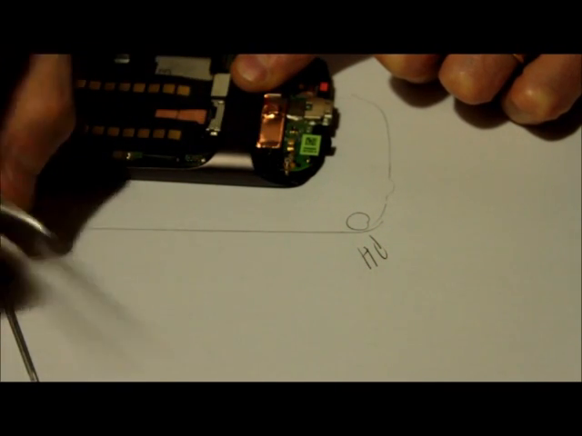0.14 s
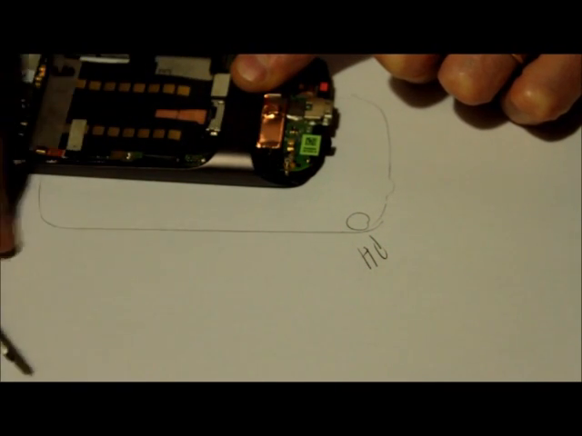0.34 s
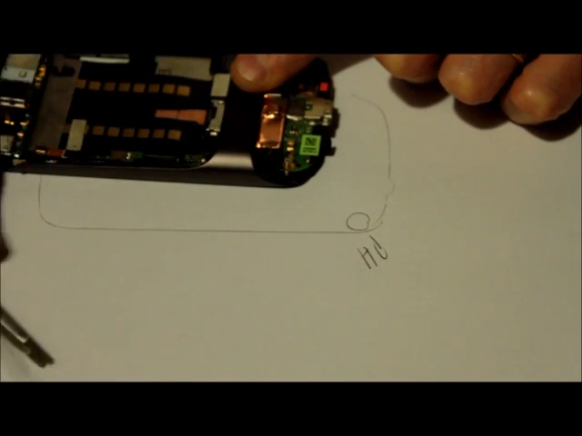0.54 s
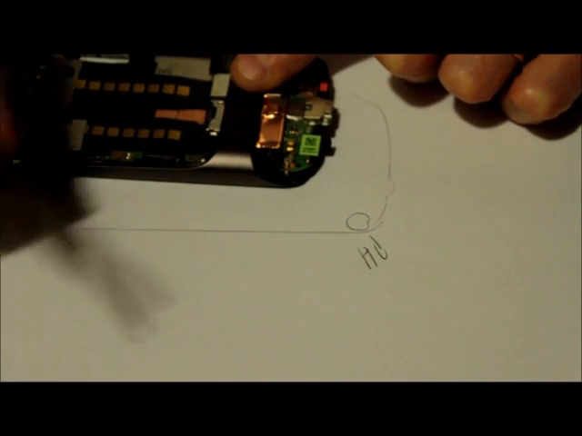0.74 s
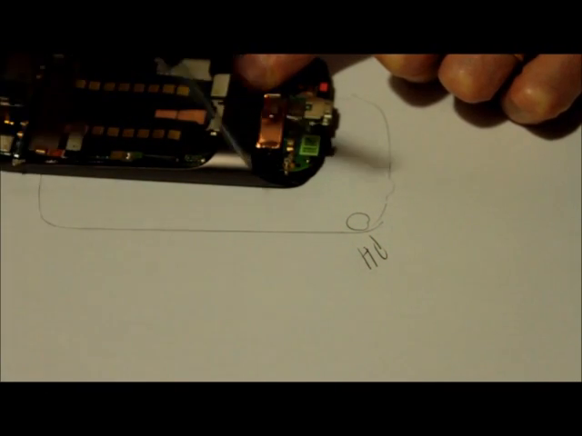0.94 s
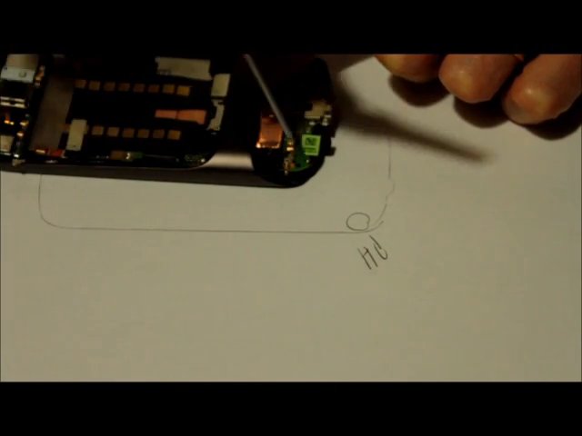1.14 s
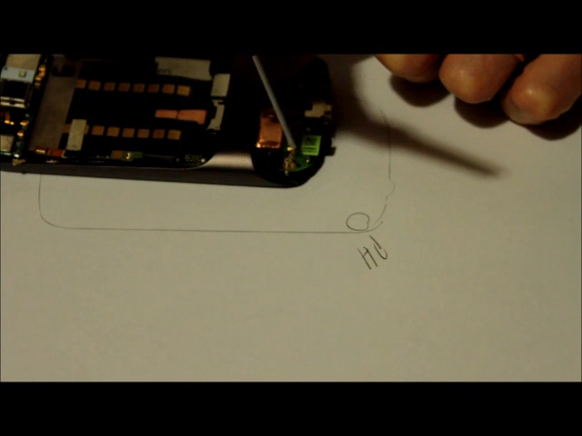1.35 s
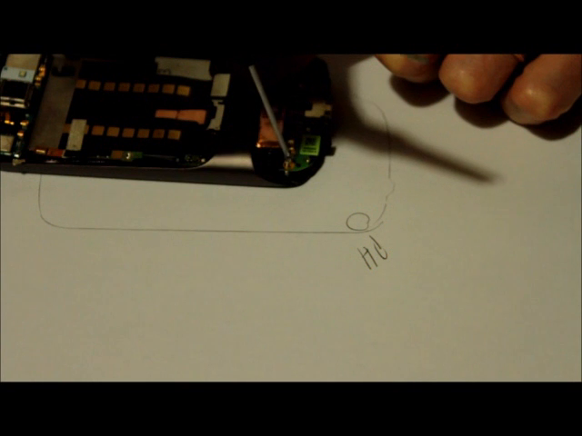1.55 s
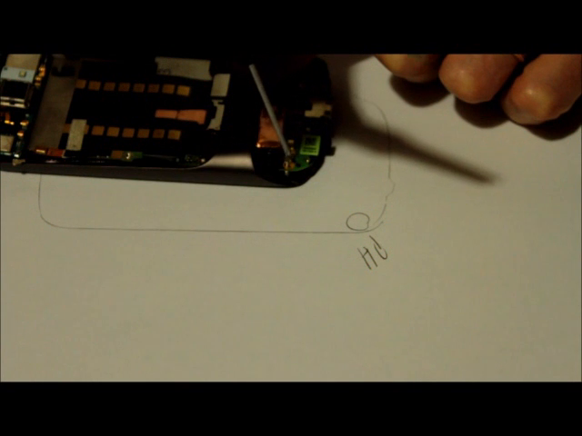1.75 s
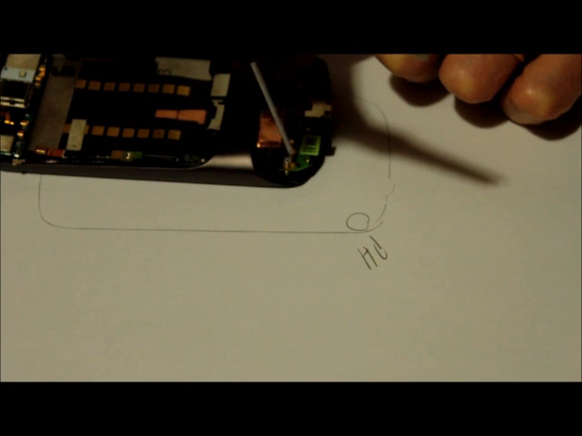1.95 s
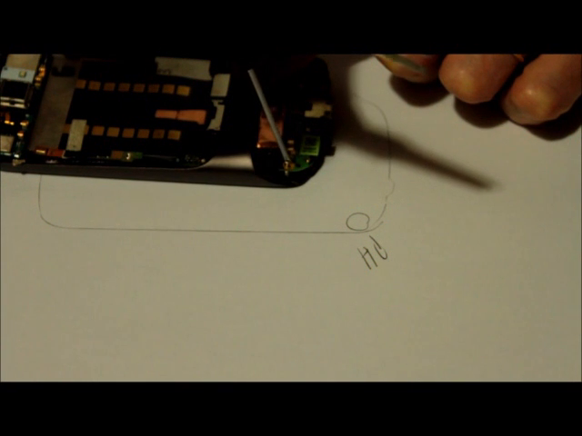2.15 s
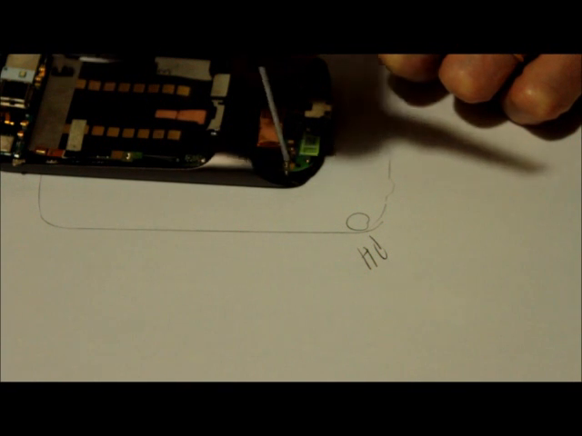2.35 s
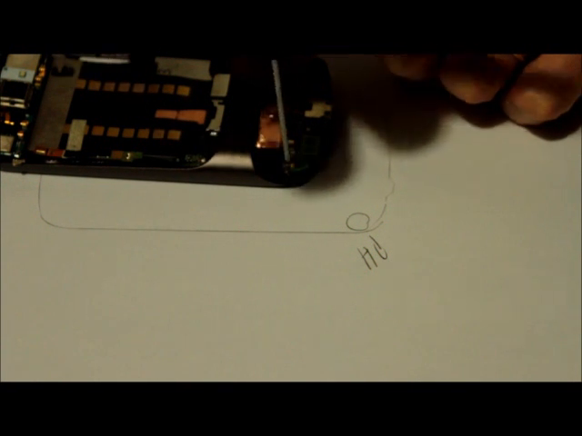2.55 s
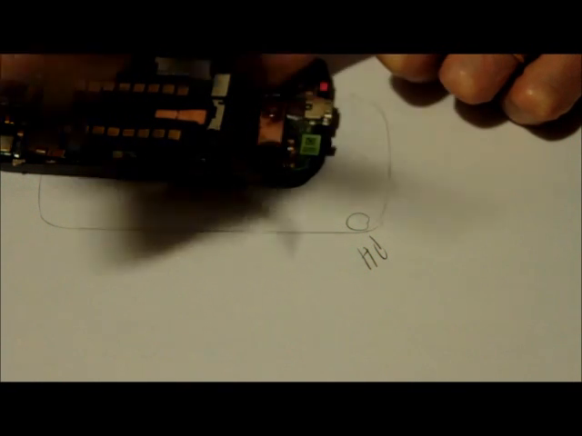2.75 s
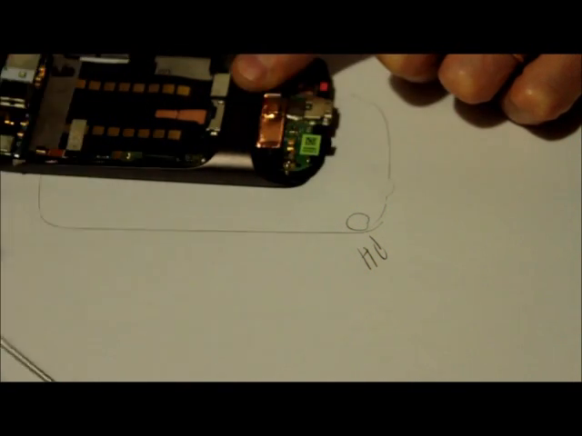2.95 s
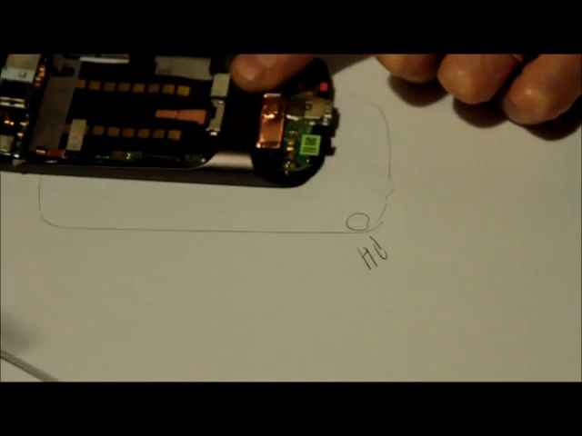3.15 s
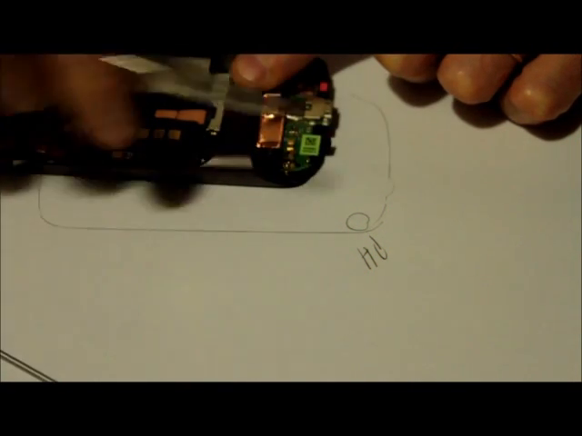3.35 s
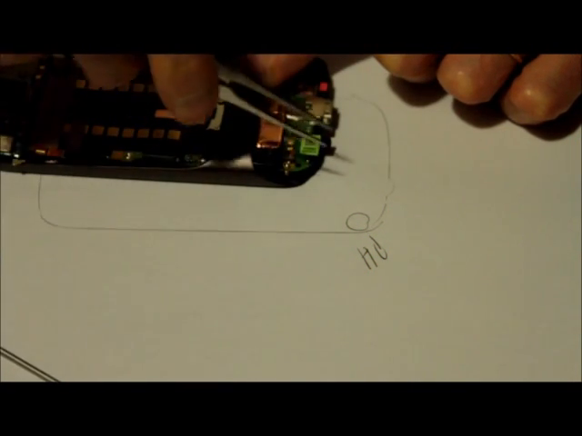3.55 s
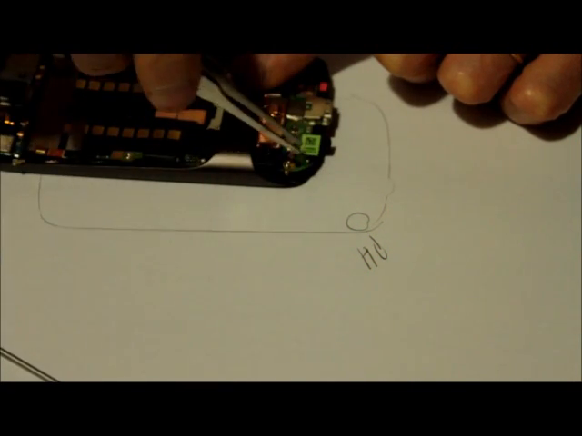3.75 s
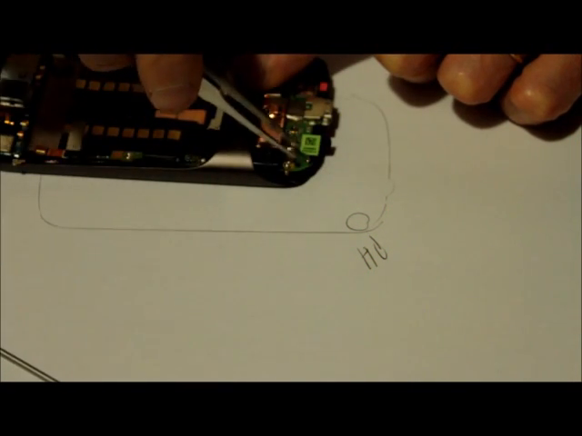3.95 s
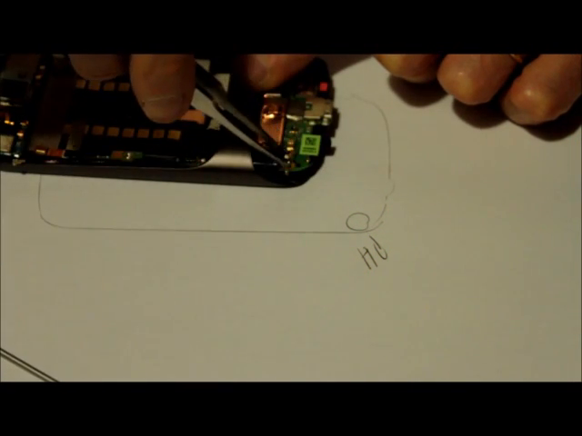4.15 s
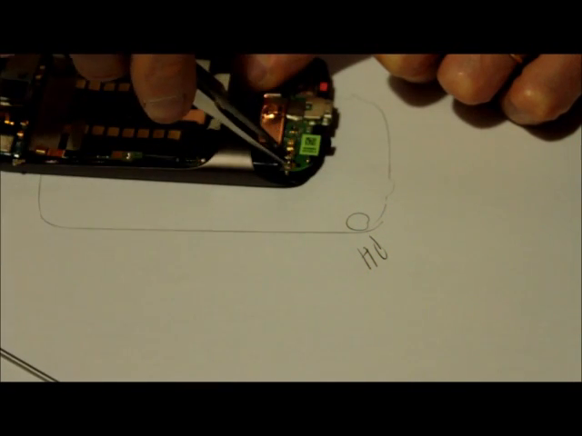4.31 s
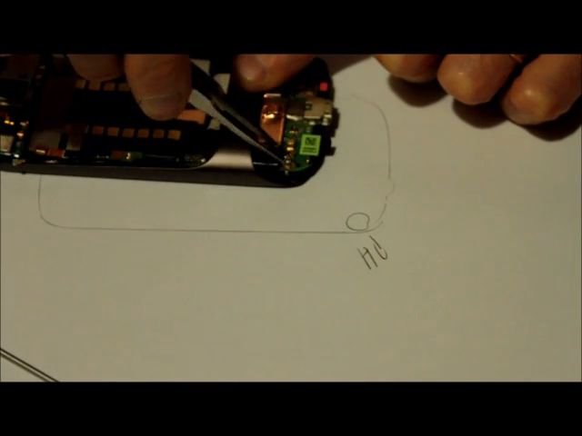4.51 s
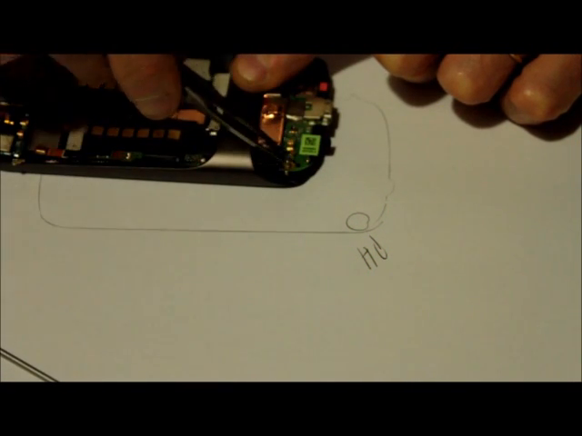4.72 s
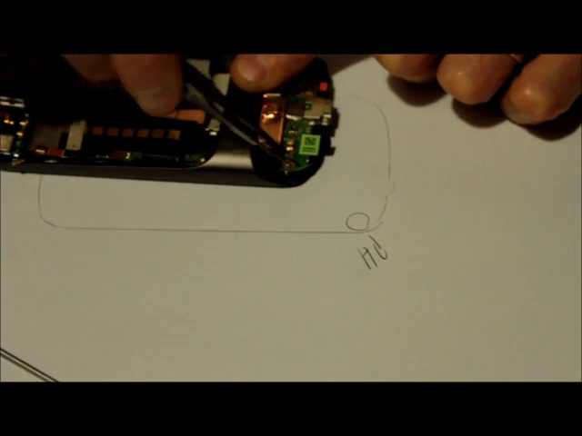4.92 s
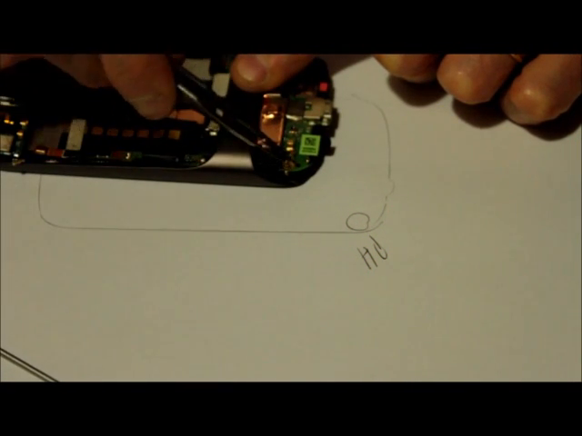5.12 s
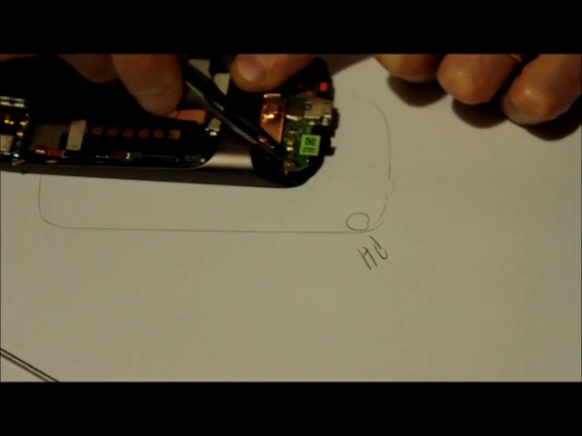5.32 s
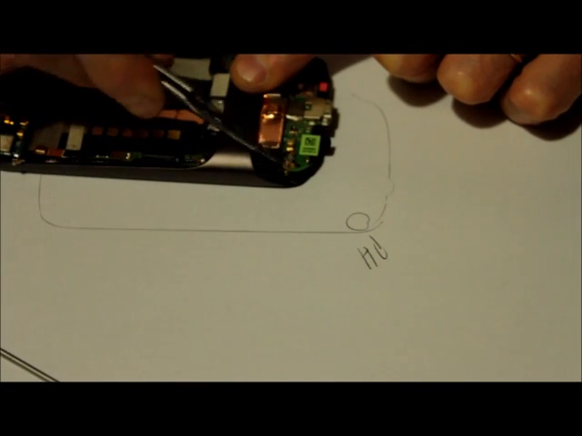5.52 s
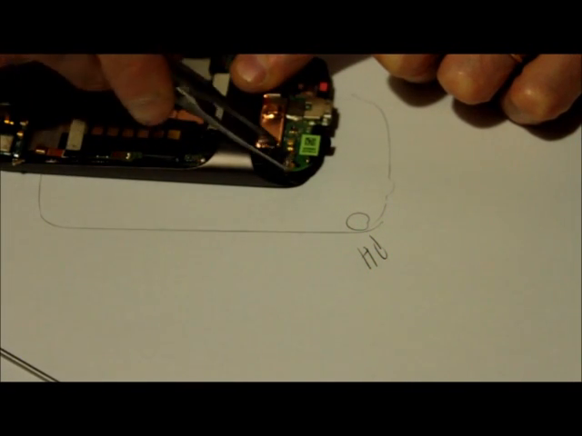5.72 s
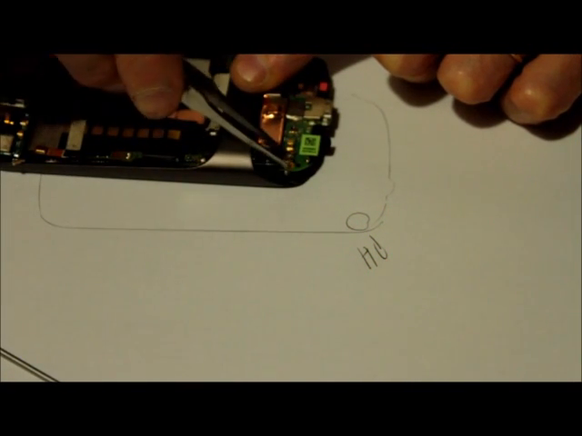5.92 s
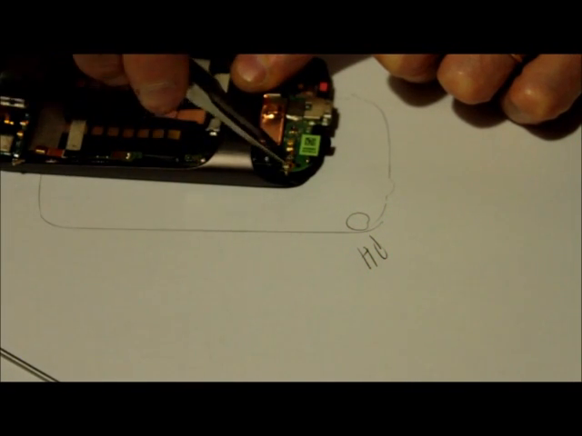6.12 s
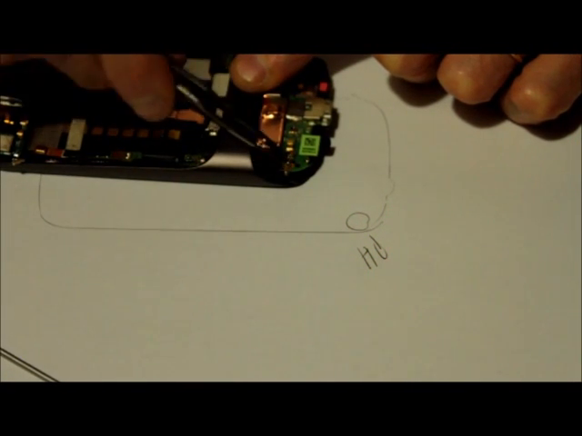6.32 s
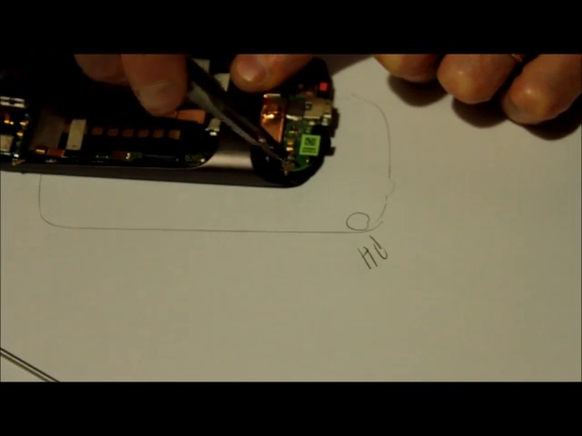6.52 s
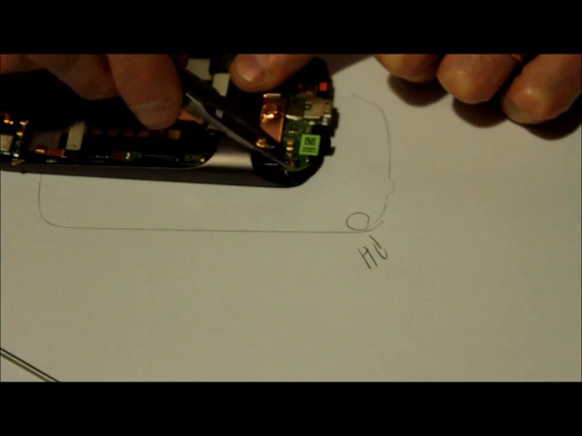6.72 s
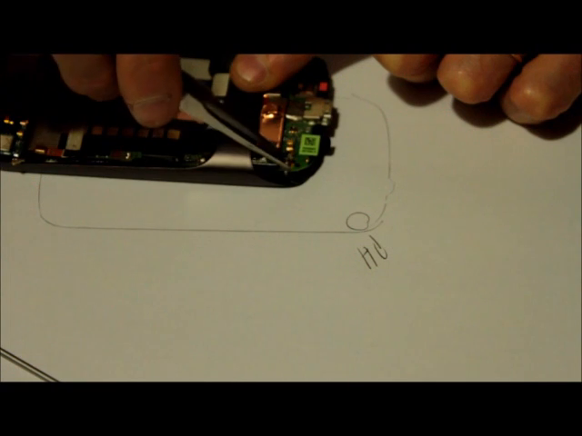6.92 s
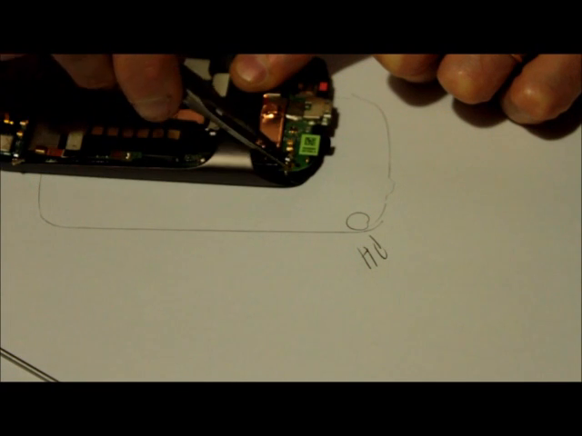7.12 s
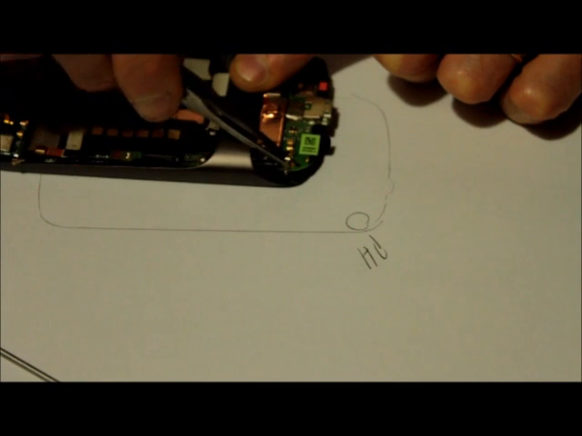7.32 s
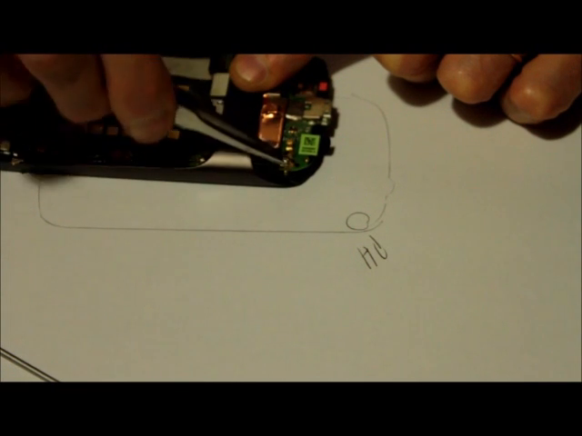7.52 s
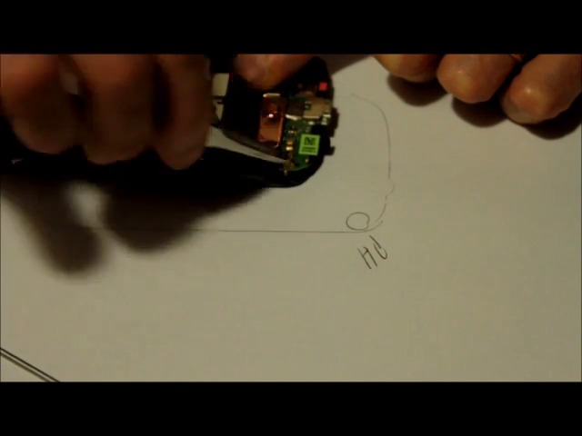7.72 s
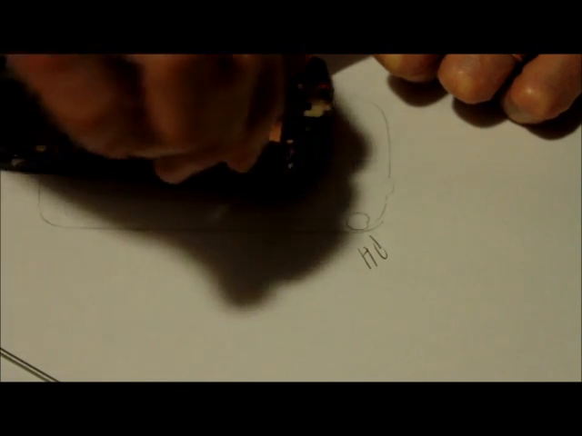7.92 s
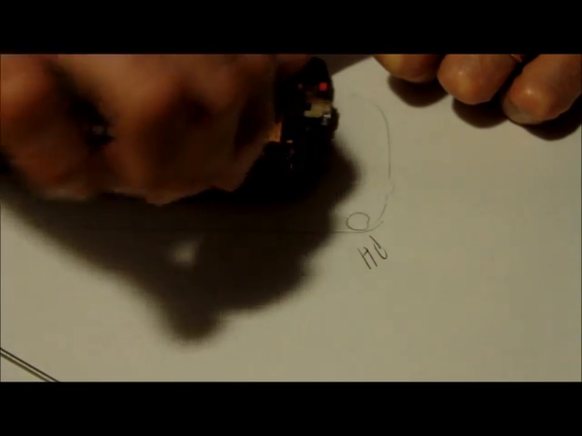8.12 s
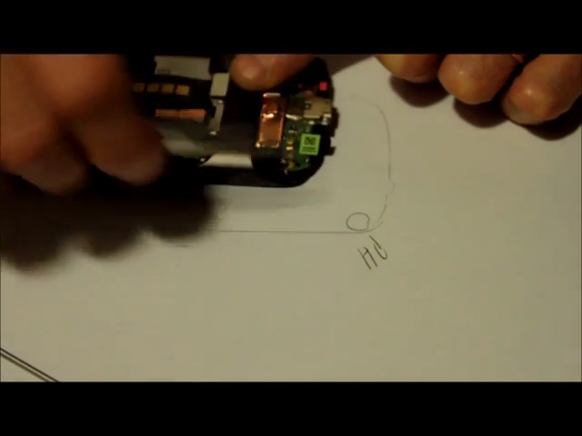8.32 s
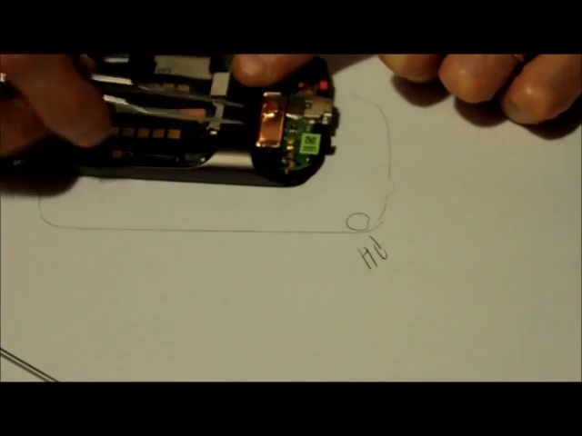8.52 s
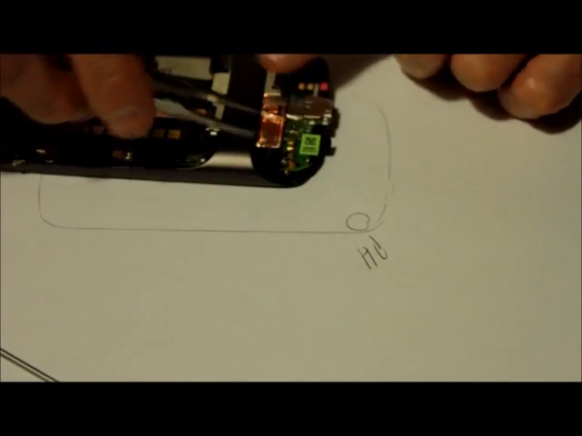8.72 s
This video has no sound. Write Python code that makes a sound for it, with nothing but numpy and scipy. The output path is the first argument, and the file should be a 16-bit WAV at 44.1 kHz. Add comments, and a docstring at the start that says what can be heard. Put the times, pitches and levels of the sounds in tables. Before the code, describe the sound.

Close, dry metallic clicks and brief scratches of small hand tools on electronics, over faint hum and hiss, busy at first, then scattered ticks.

```python
"""A screwdriver and steel tweezers work up close on a circuit board lying on a paper-covered desk, for nine seconds.
Filtered-noise rumble and hiss, with sine drone, hum and whine, start slightly ducked and recover.
Noise strokes then scrape over paper, and noise bursts through resonators click from 0.4 s, with decaying sines
as desk thumps. The loudest pair comes near 3.2 s, then sparser taps follow; the background dips near 3.2, 5.6 and
8.1 s. A short decaying-noise room tail answers the tools; nothing sounds above about 16 kHz."""
import sys
import numpy as np
from scipy import signal
from scipy.fft import rfft, irfft
from scipy.io import wavfile
from scipy.ndimage import uniform_filter1d

SR = 44100
rng = np.random.default_rng(int(sys.argv[2]) if len(sys.argv) > 2 else 0)


def wrap_up_sound(samples):
    """Save the sound to the file named by the first command line argument, as 16-bit audio."""
    columns = np.atleast_2d(samples).T
    # keep every value between -1 and 1, then stretch to whole-number steps
    tamed = np.clip(columns, -1, 1)
    steps = np.round(tamed * 32767).astype(np.int16)
    wavfile.write(sys.argv[1], SR, steps)


N = 390726

# Spectrum of the rumble and hiss. Each row: frequency in Hz, relative density in dB per Hz.
AIR_SPECTRUM = [(15, -50), (25, -27), (70, -8), (138, 2.5), (273, -11), (399, -16.5), (433, -16.5),
                (483, -17.5), (1250, -25.5), (1640, -24.5), (1780, -25), (1930, -26.5), (2460, -28.5),
                (14000, -36), (16500, -42)]
# Loudness path of the low drone. Each row: time in seconds, rms level in dB before the dips.
DRONE_LEVELS = [(0, -44), (.3, -47), (.85, -49.5), (1.9, -45), (2.8, -58), (3.4, -65), (5.5, -60),
                (6.8, -59), (8.86, -74)]
# Partials of the electronic whine. Each row: multiple of the base pitch, rms level in dB before the dips.
WHINE_PARTIALS = [(4, -71.5), (6, -78.5), (7, -69.5), (8, -68), (9, -65), (10, -65), (11, -73.5), (14, -76),
                  (15, -73.5), (16, -77.5)]
# Sudden drops of the background. Each row: start in seconds, depth in dB.
BACKGROUND_DIPS = [(-.2, 3), (3.19, 5.5), (5.57, 5.5), (8.12, 3)]
# Tools and fingers sliding. Each row: start in seconds, rise in ms, hold in ms, main fade in ms (a last fade
# takes as long again), level in dB, then bright, treble and low shares in dB.
STROKES = [(.22, 40, 41, 70, -63, -9, 7, -11), (0.4, 6.4, 17.6, 40, -31, 0.5, -5, -18),
           (.462, 21.5, 12, 128, -33.5, -1.5, -5, -18), (.545, 32, 20, 27, -52, -5, -7, -11),
           (0.663, 12.5, 14.6, 20, -35, 10, 0, -21), (.715, 18, 5, 27, -42.5, -14, -14, -11),
           (.745, 15, 55, 51, -60, -5, 0, 2), (.885, 9.9, 16, 53, -54, -3, 7.5, 3.5),
           (.95, 44, 55, 140, -53.5, -13, 0, 0.5), (1.115, 3.7, 15, 25, -35, -4, -3, 2.5),
           (1.136, 9.7, 3.7, 6.7, -26, -5.5, -1, -10), (1.158, 5.1, 2.7, 49, -43, -12, -12, 5),
           (1.18, 8, 10, 200, -55, -7, -12, 0), (2.46, 20, 8.4, 120, -52.5, -6, -6, 5.5),
           (2.769, 34, 44, 110, -64, 3, -9.5, 13.5), (2.994, 4, 10, 25, -22, -6, -13, -30),
           (3.004, 10, 6.8, 31, -24, 3, -3, -33), (3.02, 9.4, 6.6, 24, -35, 7, 5, -24),
           (3.04, 5.8, 21, 26, -31, -11, -9, -31), (3.09, 20, 37, 40, -51.5, -10, 3, -17),
           (3.265, 5.4, 26, 174, -48, -7, -15, -7), (4.76, 67, 27, 46, -59, -9, -6, 7),
           (6.77, 30, 18, 120, -60, -7, -10, 5), (8.67, 85, 8, 92, -47, -7, -3, -9),
           (8.81, 27, 4, 73, -53, -11, -12, -6)]
# Resonances of the screwdriver shaft. Each row: frequency in Hz, width in Hz, level in dB.
SHAFT_MODES = [(3540, 350, -0.5), (4920, 620, 12), (5930, 1200, 2.5), (7400, 1500, 4.5), (9700, 990, -15),
               (11200, 1600, 7.5), (14500, 4200, 14)]
# Tip contacts. Each row: start in seconds, overall level in dB, pitch of the ringing part in Hz, its t60 in ms,
# tweezer, board and desk thump shares in dB, chatter decay constant in ms, room share in dB.
CONTACTS = [(0.4028, -26, 4970, 7, 2, -36, -34, 1.2, -14), (0.4152, -15, 5150, 3, -17, -42, -32, 1.4, -2),
            (0.733, -18.5, 3540, 4.6, -2, -33, -31, 0.43, -13),
            (1.114, -8, 3900, 3.7, 1.8, -19, -19.5, 2.3, -11), (1.154, -13, 7350, 6, 4, -15, -31, 1.1, -27),
            (1.165, -20, 4150, 63, -15, -25, -32, 0.95, -7.5),
            (1.6863, -43.5, 2780, 7, 12, -18, -14, .9, -14),
            (1.895, -23.5, 3400, 3.9, -3.5, -15, -20, 1.6, -13),
            (1.9816, -39, 7060, 7, -1, -9, -11, 1.2, -12), (2.154, -26, 8740, 5.4, -6, -8, -11, 1.4, -12),
            (2.1844, -23.5, 3020, 4.3, 1.5, -6.5, -5, 2.2, -10),
            (2.4316, -32.5, 2590, 9, -16, -17, -18, 1.4, -14),
            (2.4754, -35, 11700, 60, -8, -4, -19, 1.3, -12),
            (2.4915, -32.5, 3330, 7, -4, -0.5, -3, 7.5, -7),
            (2.5258, -37, 11700, 64, -14, -14, -9, 1.2, -9), (2.6677, -35.5, 5430, 7, -7, -5, -13, 1.5, -2),
            (2.9175, -26.5, 2780, 10, -18, -26, -26, 1.1, -14),
            (2.9712, -34, 3280, 9, -15, -12, -20, 1.2, -14),
            (2.9965, -8.5, 4600, 6.5, -12, -18, -35, 0.71, -16),
            (3.1888, 1.5, 6100, 3, -12, -33, -22.5, 0.46, -21),
            (3.1923, -2.5, 4700, 11, 0.5, -21, -12, 1.26, -14),
            (3.2015, -31.5, 11000, 8, -2, 3, 9.5, 1.4, -2), (3.2527, -14, 5800, 7, -13, -23, -35, 2.2, -16),
            (3.2552, -16, 5370, 8.3, -5, -19, -10.5, 1.8, -18),
            (3.262, -12.5, 3500, 11, 1.5, -30, -35, 2, -26),
            (3.2837, -34, 4700, 150, -12, -20, -18, 1.5, -8),
            (3.3037, -24.5, 6200, 6, -8, -33, -27, 1.1, -12),
            (4.204, -40, 6150, 7, 6.5, -22, -11, 1.7, -14),
            (4.8469, -23.5, 7800, 5.7, 2, -7, -12, 0.72, -17),
            (5.3245, -27, 7600, 5.7, -4, -5.5, -28, 1.1, -13),
            (5.5667, -11.5, 7920, 18, 6.5, -10, -19, 2.2, -15),
            (5.5727, -17.5, 3830, 15, 3.5, -5, -8, 2.2, -4), (5.884, -42, 5830, 5.5, 1, -4, -5, 7.3, -4),
            (5.9607, -46, 3080, 6.6, 9, -28, 7, 6.7, -12), (6.121, -34, 5600, 14, 4.5, -3, 3, 2.6, -10),
            (6.292, -32, 865, 25, -30, -19, -10, 6, -2), (6.8461, -39, 2540, 6.5, 4, -6, 12, 5.8, -14),
            (6.9425, -32, 910, 13, 6.5, -6.5, -7, 7.8, -20), (6.996, -36, 3760, 7, 9.5, -24, -21, 3.1, -12),
            (7.4996, -29, 4490, 7.7, 2.5, 1.5, -9, 1.2, -12), (7.5767, -34, 2630, 8, -6, -19, -9, 1.3, -14),
            (7.6251, -44, 2610, 7, 3, -16, -8, 1.2, -14), (7.764, -42, 2820, 7, -4, 0, -1, 1.2, -14),
            (8.0967, -48, 7540, 8, -5.5, 9, -8, 1.9, 2), (8.1221, -5, 7700, 6, 2, -14, -18.5, 1.96, -13.5),
            (8.1259, -12.5, 5720, 11, -11, -5.5, -10, 1.3, -6),
            (8.45, -30.5, 890, 7.6, -23, 0, -3, 2.3, -5.5), (8.665, -31.5, 3950, 7, -4, -6, -17, 1.5, -4),
            (8.81, -20.5, 1390, 5.9, -16, -26, -27, 2.1, -8)]
# Resonances of the tweezers. Each row: frequency in Hz, width in Hz, level in dB.
TWEEZER_MODES = [(3690, 170, -12.5), (5620, 450, -14.5), (7860, 1500, -9.5), (10200, 380, -6),
                 (11120, 650, -5.5), (12950, 530, -12), (13780, 1760, 1), (16100, 640, 2)]
# Resonances of the circuit board. Each row: frequency in Hz, width in Hz, level in dB.
BOARD_MODES = [(900, 270, 12), (1447, 240, 12.5), (2364, 210, 13), (3170, 750, 6), (4360, 490, 8),
               (5030, 1500, 2)]
# Ringing modes of the desk. Each row: frequency in Hz, level in dB, t60 in seconds.
DESK_MODES = [(104, -13, 0.29), (148, -11, 0.61), (189, 6.5, 0.095), (269, 9.5, 0.097), (334, -1, 0.17),
              (359.7, 8.5, 0.14), (453, -4.5, 0.1), (502, 2, 0.28), (594, 4, 0.22)]

AIR_DB = -45
DRONE_HZ, DRONE_WAVER_HZ = 51.2, 1.665
HUM_HZ, HUM_DB = 398.5, -62.5
WHINE_HZ = 187.5
DIP_HOLD_S, DIP_RECOVER_DB_PER_S = 0.11, 7
# the more of a hit goes into the desk, the deeper the thump
THUMP_HZ, THUMP_HZ_PER_DB = 156, -7.0
ROOM_T60_S, SCRAPE_ROOM_DB = 0.3, -11.5
TOP_HZ = 15800


def undb(db):
    """Gain of a level in dB."""
    return 10 ** (np.asarray(db) / 20)


def unit(x):
    """Scaled to rms 1."""
    return x / np.sqrt(np.mean(x ** 2))


def peak(x):
    """Scaled to peak 1."""
    return x / np.max(np.abs(x))


def band(x, lo_hz, hi_hz):
    """Band-pass between two edges, the upper one kept below Nyquist."""
    edges_hz = [lo_hz, min(hi_hz, .45 * SR)]
    return signal.sosfilt(signal.butter(2, edges_hz, "band", fs=SR, output="sos"), x)


def resonate(x, hz, width_hz):
    """One resonance, gain 1 at its centre."""
    return signal.lfilter(*signal.iirpeak(hz, hz / width_hz, SR), x)


def resonate_all(x, modes):
    """A body with several resonances side by side, each at its own level."""
    return sum(undb(db) * resonate(x, hz, width_hz) for hz, width_hz, db in modes)


def walk(rate):
    """Random wander: values held for 1 / rate seconds and smoothed twice."""
    hold = int(SR / rate)
    steps = np.repeat(rng.standard_normal(N // hold + 1), hold)
    return 0.935 * uniform_filter1d(uniform_filter1d(steps, hold), hold)[:N]


def air():
    """Shaped noise: rumble whose level wanders below about 700 Hz, steady hiss above."""
    f = np.fft.rfftfreq(N, 1 / SR) + 1  # offset avoids log of zero
    hz, db = np.transpose(AIR_SPECTRUM)
    shape = undb(np.interp(np.log(f), np.log(hz), db))
    noise = unit(irfft(rfft(rng.standard_normal(N)) * shape, N))
    rumble = signal.sosfiltfilt(signal.butter(2, 700., fs=SR, output="sos"), noise)
    hiss = noise - rumble
    return undb(AIR_DB) * (hiss + rumble * undb(1.2 * walk(9.0)))


def drone(t):
    """A low sine of wavering pitch that follows its loudness path."""
    hz = DRONE_HZ + DRONE_WAVER_HZ * walk(2.0)
    level = undb(np.interp(t, *np.transpose(DRONE_LEVELS)))
    return level * np.sin(2 * np.pi * np.cumsum(hz) / SR)


def hum(t):
    """A faint sine whose level and phase drift a little."""
    level = undb(HUM_DB + 0.5 * walk(2.09))
    return level * np.sin(2 * np.pi * HUM_HZ * t + 0.32 * walk(4.5))


def whine(t):
    """Steady harmonics of one pitch, with phases spread by the square of the harmonic number."""
    return sum(undb(db) * np.sin(2 * np.pi * k * WHINE_HZ * t + .8 * k * k) for k, db in WHINE_PARTIALS)


def background():
    """Rumble and hiss, with the drone, hum and whine brought from peak to rms levels."""
    t = np.arange(N) / SR
    return air() + np.sqrt(2) * (drone(t) + hum(t) + whine(t))


def dips():
    """Gain of the background: a sudden drop, a hold, a steady climb back in dB."""
    t = np.arange(N) / SR
    drop_db = 0
    for s, depth_db in BACKGROUND_DIPS:
        left_db = depth_db - DIP_RECOVER_DB_PER_S * (t - s - DIP_HOLD_S)
        drop_db = drop_db + (t > s) * np.clip(left_db, 0, depth_db)
    return undb(-drop_db)


def scrapes():
    """Dense uneven slips over paper grain excite the shaft's resonances and a broad rasp, shaped into strokes."""
    t, out = np.arange(N) / SR, np.zeros(N)
    unevenness_db = 1.8 * rng.exponential(size=N) + 2.6 * walk(800) + 2.0 * walk(110)
    slips = rng.standard_normal(N) * undb(unevenness_db)
    body = unit(resonate_all(slips, SHAFT_MODES)) + undb(-3.5) * unit(slips)
    mid = unit(band(body, 2800., 5700.))
    bright = unit(band(body, 5700., 9500.))
    treble = unit(band(body, 9500., 17000.))
    low = unit(band(body, 1500., 2800.))
    for s, rise_ms, hold_ms, fade_ms, db, bright_db, treble_db, low_db in STROKES:
        turns = s + np.cumsum([0, rise_ms, hold_ms, fade_ms, fade_ms]) / 1000
        at = slice(int(s * SR), min(int(turns[-1] * SR), N))
        level_db = db + np.interp(t[at], turns, [-24.19, -2.36, -2.0945, -33.335, -59])
        # neighbouring bands alternate in sign so that they join without a gap
        mix = mid[at] - undb(bright_db) * bright[at]
        mix = mix + undb(treble_db) * treble[at] - undb(low_db) * low[at]
        out[at] += undb(level_db) * mix
    return out


def chatter(ms, t):
    """Micro-impacts that die away, their spectrum evened out so they push all pitches about equally."""
    impacts = rng.standard_normal(len(t)) * np.exp(-1000 * t / max(ms, .15)) * (t < .03)
    spectrum = rfft(impacts)
    smooth = np.sqrt(uniform_filter1d(np.abs(spectrum) ** 2, size=25))
    return irfft(spectrum / smooth, len(t)) * np.exp(-t / .03)


def struck_part(push, hz, t60_ms):
    """The touched part: one ringing resonance plus a broad click around it."""
    width_hz = np.log(1000) / np.pi / (max(t60_ms, 1) / 1000)  # a longer ring is a narrower resonance
    return peak(resonate(push, hz, width_hz)) + undb(-4.5) * peak(band(push, hz / 3.3, hz * 3.6))


def tweezers(push):
    """Steel resonances of the tweezers with a little broad-band click."""
    return peak(resonate_all(push, TWEEZER_MODES) + undb(-25.0) * band(push, 4300.0, 12000.0))


def desk_thump(thump_db, t):
    """Decaying desk modes, slightly detuned each time; those near the thump's pitch are favoured."""
    near_hz = max(THUMP_HZ + THUMP_HZ_PER_DB * thump_db, DESK_MODES[0][0])
    hz, db, t60 = np.transpose(DESK_MODES)[:, :, None]
    db = db - 9.7 * np.log2(hz / near_hz) ** 2
    detune = 1 + .015 * rng.standard_normal(hz.shape)
    modes = undb(db - 60 * t / t60) * np.sin(2 * np.pi * hz * detune * t)
    # the desk takes a moment to start moving
    return peak(np.sum(modes, axis=0)) * (1 - np.exp(-t / 0.0014))


def clicks():
    """Each contact's chatter rings part, tweezers and board, with a desk thump; rows: direct, to the room."""
    out, t = np.zeros((2, N + SR)), np.arange(SR // 4) / SR
    for s, db, hz, t60_ms, steel_db, board_db, thump_db, chatter_ms, room_db in CONTACTS:
        push = chatter(chatter_ms, t)
        board = peak(resonate_all(push, BOARD_MODES))
        hit = undb(-11.0) * struck_part(push, hz, t60_ms)
        hit = hit + undb(steel_db) * tweezers(push) + undb(board_db) * board
        direct = hit + undb(thump_db) * desk_thump(thump_db, t)
        i = int(s * SR)
        # the thump stays out of the room send
        out[:, i:i + len(t)] += undb(db) * np.array([direct, undb(room_db) * hit])
    return out[:, :N]


def room(send):
    """Small-room tail: decaying noise of unit energy stands for diffuse reflections that build up quickly."""
    t = np.arange(SR // 2) / SR
    tail = rng.standard_normal(len(t)) * undb(-60 * t / ROOM_T60_S) * (1 - np.exp(-t / 0.00093))
    return signal.fftconvolve(send, tail / np.sqrt(np.sum(tail ** 2)))[:N]


def scene():
    """Bench sounds with their room tail, over the dipping background."""
    bed = dips() * background()
    rubs = scrapes()
    taps, taps_to_room = clicks()
    wet = room(taps_to_room + undb(SCRAPE_ROOM_DB) * rubs)
    return (taps + rubs + wet + bed)[None]


def record(dry):
    """A steep low-pass ends the sound near 15.8 kHz."""
    return signal.sosfilt(signal.ellip(10, .2, 70, TOP_HZ, fs=SR, output="sos"), dry)


dry = scene()
out = record(dry)
wrap_up_sound(out)
```